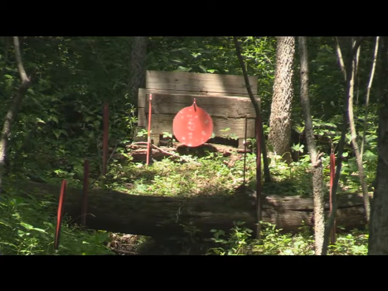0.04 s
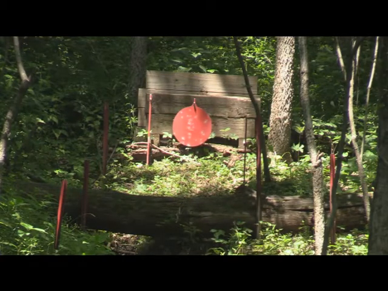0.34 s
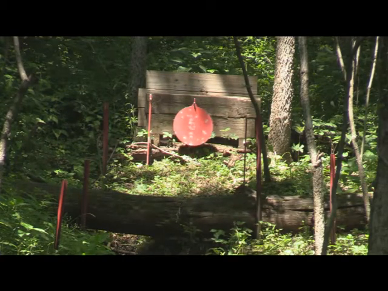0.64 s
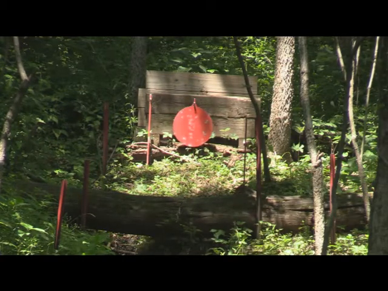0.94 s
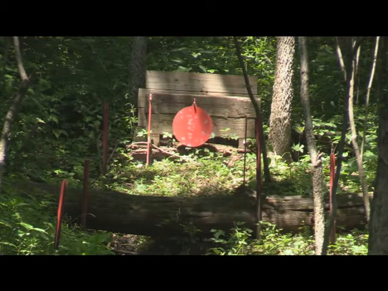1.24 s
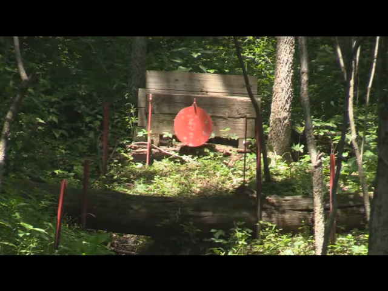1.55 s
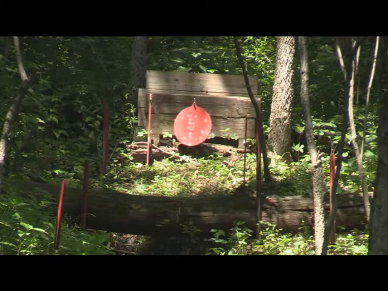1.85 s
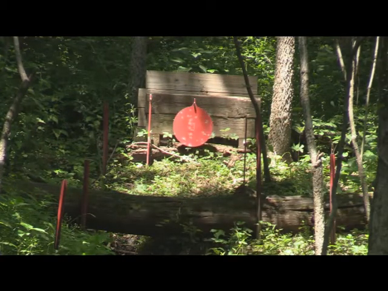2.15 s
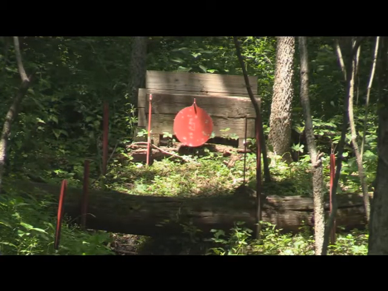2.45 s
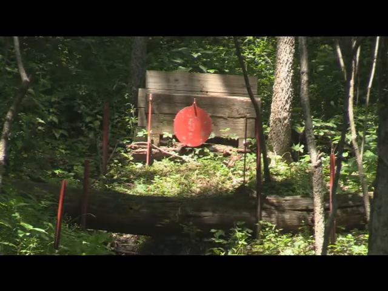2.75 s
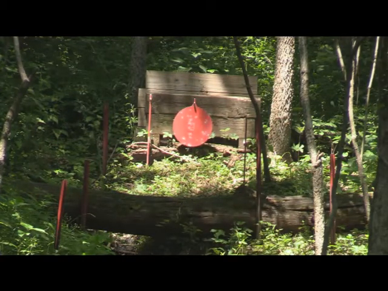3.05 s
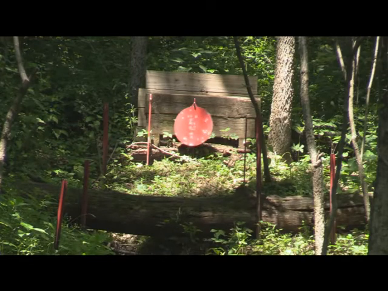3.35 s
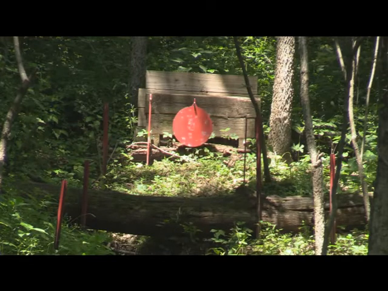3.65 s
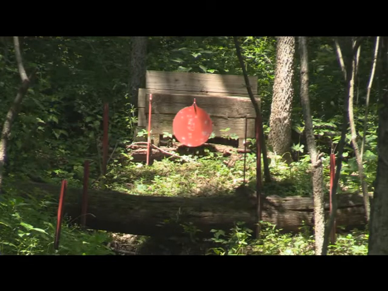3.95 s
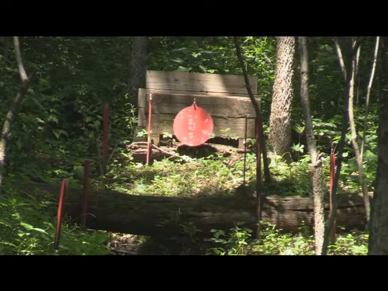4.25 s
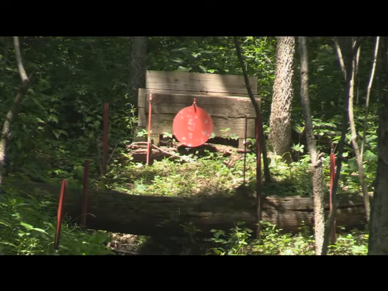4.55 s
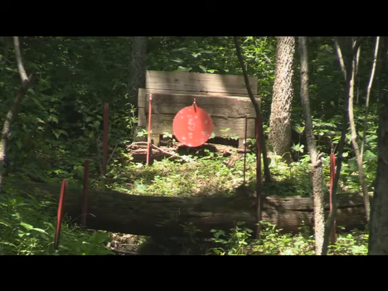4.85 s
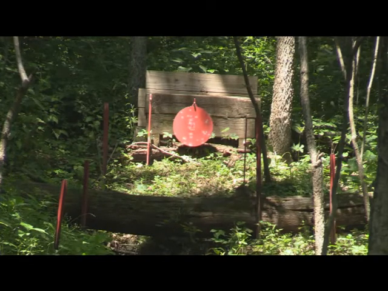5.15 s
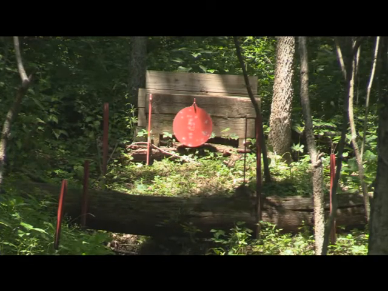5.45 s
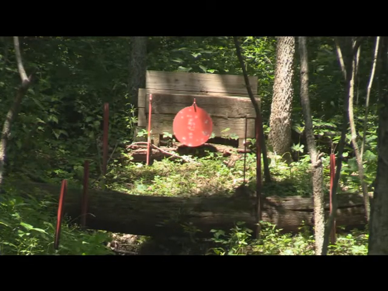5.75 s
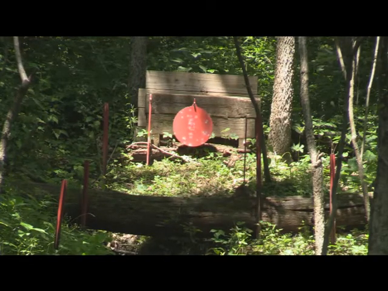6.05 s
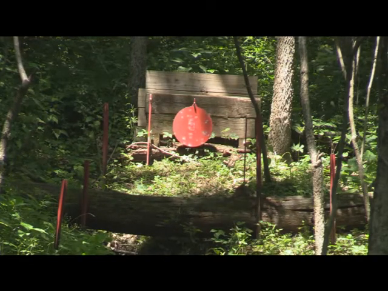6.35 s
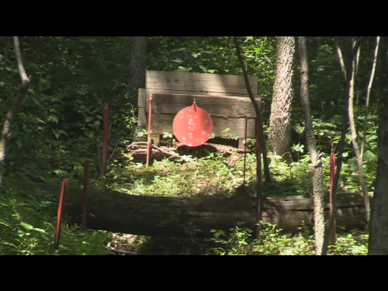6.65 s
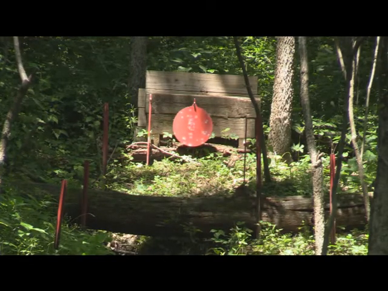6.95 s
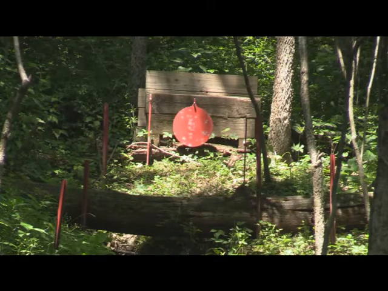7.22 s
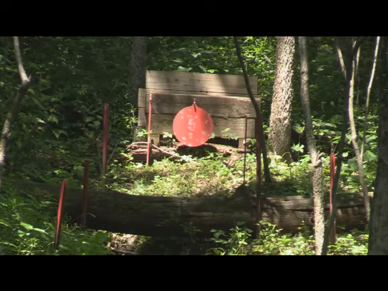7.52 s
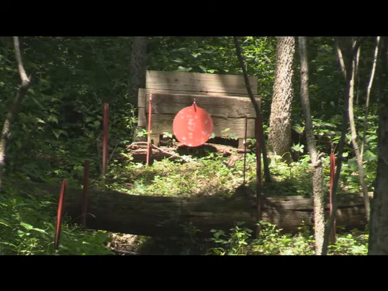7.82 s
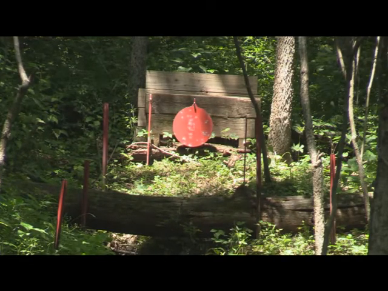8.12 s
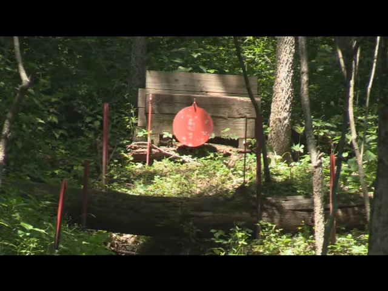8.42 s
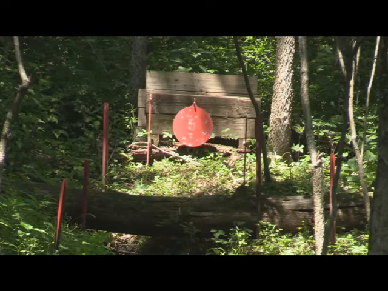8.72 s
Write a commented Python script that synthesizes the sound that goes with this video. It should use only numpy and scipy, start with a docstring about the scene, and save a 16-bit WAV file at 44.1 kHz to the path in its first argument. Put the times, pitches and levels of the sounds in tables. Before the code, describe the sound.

A small pistol fires five times outdoors, a far steel target ringing three times, with brass cases landing and metallic clicks afterward.

```python
"""A wood: five shots from a small pistol. Three bullets ring a distant steel gong, the last two hit the
boards behind it. Each report overloads the microphone and rolls back from the trees while the gain
control holds it level. Spent brass cases land nearby, then the pistol is handled with small metal
snaps, ticks and rubs. Leaves and far insects hiss throughout; a small bird whistles far off."""
import sys
import numpy as np
from scipy import signal
from scipy.fft import rfft, irfft, next_fast_len
from scipy.io import wavfile

SR = 44100
rng = np.random.default_rng(int(sys.argv[2]) if len(sys.argv) > 2 else 0)


def generate_wav(sig):
    """Save sig (samples, or channels by samples) to the path in sys.argv[1] as 16-bit PCM at SR."""
    pcm = np.round(np.clip(np.atleast_2d(sig).T, -1, 1) * 32767).astype(np.int16)
    wavfile.write(sys.argv[1], SR, pcm)


N = 396018
TIME = np.arange(N) / SR


def from_db(db):
    """Decibels to gain."""
    return 10 ** (np.asarray(db) / 20)


def fade(age, t60):
    """Zero before the start, then a fall of 60 dB per t60."""
    return (age >= 0) * np.exp(-np.log(1000) * np.maximum(age, 0) / t60)


def hump(age, width):
    """Bell curve around age zero."""
    return np.exp(-.5 * (age / width) ** 2)


def ages(length_s):
    """Sample times of a short sound."""
    return np.arange(int(length_s * SR)) / SR


def add(out, start_s, sound):
    """Mix a sound in; what falls outside is dropped."""
    at = int(round(start_s * SR))
    first, last = max(at, 0), min(at + len(sound), N)
    if last > first:
        out[first:last] += sound[first - at:last - at]


def db_at(colour, hz):
    """Level of a spectrum, interpolated over log frequency."""
    points_hz, db = np.transpose(colour)
    return np.interp(np.log(hz), np.log(points_hz), db)


def noise(colour, size=N):
    """Coloured noise, rms 1."""
    padded = next_fast_len(size, True)
    bin_hz = np.maximum(np.fft.rfftfreq(padded, 1 / SR), 1)
    x = irfft(rfft(rng.standard_normal(padded)) * from_db(db_at(colour, bin_hz)), padded)[:size]
    return x / x.std()


def swells(rows, colour):
    """Noise that rises and falls in bell curves."""
    return noise(colour) * sum(from_db(db) * hump(TIME - peak_s, width_s) for peak_s, db, width_s in rows)


# Each row: frequency in Hz, relative density in dB.
AIR_COLOUR = [(15, -40), (25, -3.5), (84, 0), (195, 1.5), (373, -1.5), (451, -4.5), (607, -5),
              (1290, -11.5), (1440, -11.5), (2350, -12.5), (5730, -10.5), (8140, -22.5), (14000, -28),
              (16000, -34)]


def air(level_db=-46.5):
    """Steady hiss of leaves and far insects."""
    return from_db(level_db) * noise(AIR_COLOUR)


# Each row: start in seconds, level in dB.
WHISTLES = [(8.207, -55), (8.54, -54), (8.865, -52)]


def bird(length_s=.085, from_hz=1750, to_hz=2900):
    """Thin whistles, each the same rising glide."""
    out, t = np.zeros(N), ages(length_s)
    pitch_hz = from_hz * (to_hz / from_hz) ** (t / length_s)
    phase = 2 * np.pi * np.cumsum(pitch_hz) / SR
    for start, db in WHISTLES:
        add(out, start, from_db(db) * np.sin(np.pi * t / length_s) * np.sin(phase))
    return out


# Each row: peak time in seconds, level in dB, half width in seconds.
HAND_SLIDES = [(7.33, -51, 0.12), (7.885, -41.5, 0.039), (8.14, -49.5, 0.094)]
SOFT_BUMPS = [(7.297, -40, 0.029)]
# Bright scrape, dull bump. Each row: frequency in Hz, relative density in dB.
SCRAPE_COLOUR = [(60, -34), (300, -6), (1500, 2), (3000, 1), (5500, 9.5), (8000, -5), (12000, -8),
                 (16000, -23)]
BUMP_COLOUR = [(30, -20), (70, 0), (110, 10), (200, -26), (400, -24), (2000, -47)]


def hands():
    """Something slides in the hands, with one soft bump."""
    return swells(HAND_SLIDES, SCRAPE_COLOUR) + swells(SOFT_BUMPS, BUMP_COLOUR)


# Each row: frequency in Hz, relative density in dB.
TICK_COLOUR = [(300, -26), (1500, -5), (3000, 1), (6000, 15.5), (8000, -1), (12000, 1), (16000, -25)]


def tick(t):
    """Sharp start of a small contact and its faint echo from the trees."""
    direct = from_db(5) * fade(t, t60=.0089)
    echo = from_db(-24) * fade(t, t60=.49)
    return noise(TICK_COLOUR, len(t)) * (direct + echo)


def contact(ring_hz=5560, t60=.02, ring_db=-3, spread=.1465, count=9):
    """Small metal contact, by default a touch on the pistol: a tick and a brief cluster of modes."""
    t = ages(.36)
    modes_hz = ring_hz * np.exp(spread * rng.uniform(-.93, 1, (count, 1)))
    ring = np.sin(2 * np.pi * modes_hz * t).sum(0) * np.sqrt(2 / count)
    return tick(t) + from_db(ring_db) * ring * fade(t, t60)


def grip(from_s=6.9, to_s=8.4, min_db=-51, max_db=-45, count=22):
    """Tiny random ticks as fingers shift on the grip."""
    out = np.zeros(N)
    for start, db in rng.uniform((from_s, min_db), (to_s, max_db), (count, 2)):
        add(out, start, from_db(db) * contact())
    return out


# Each row: start in seconds, level in dB.
LIGHT_TOUCHES = [(6.56, -37.5), (7.1117, -39), (7.152, -41), (7.598, -44), (8.1991, -41), (8.42, -44)]
# Each row: start in seconds, level in dB, ring in Hz.
ACTION_SNAPS = [(7.1825, -25, 6000), (8.0561, -31.5, 10900)]


def pistol_clicks(snap_t60_s=.043):
    """Light touches on the pistol and longer-ringing snaps of its action."""
    out = np.zeros(N)
    for start, db in LIGHT_TOUCHES:
        add(out, start, from_db(db) * contact())
    for start, db, ring_hz in ACTION_SNAPS:
        add(out, start, from_db(db) * contact(ring_hz, snap_t60_s))
    return out


# Each row: start in seconds, level in dB.
CATCH_HITS = [(7.66, -36), (7.6798, -27), (7.74, -42)]
# Each row: frequency in Hz, relative level in dB, T60 in seconds.
CATCH_RING = [(1630, 1, 0.026), (3120, -4, .018), (4540, -2, .018), (5590, 5, 0.032)]
# Each row: frequency in Hz, relative density in dB.
RATTLE_COLOUR = [(600, -34), (1500, 2), (2300, -7), (5600, 1.5), (7000, -9), (10000, -14), (16000, -32)]


def catch(rebound_s=.0045, rebound_db=-5, ring_db=-4, tick_db=-7):
    """A catch engages and rebounds once; the loose parts around it rattle."""
    out, t = np.zeros(N), ages(.3)
    for start, db in CATCH_HITS:
        for delay, loss_db in [(0, 0), (rebound_s, rebound_db)]:
            ring = sum(from_db(mode_db) * np.sin(2 * np.pi * (hz * t + rng.random())) * fade(t, t60)
                       for hz, mode_db, t60 in CATCH_RING)
            rattle = noise(RATTLE_COLOUR, len(t)) * fade(t, t60=.037)
            click = from_db(ring_db) * ring + rattle + from_db(tick_db) * tick(t)
            add(out, start + delay, from_db(db + loss_db) * click)
    return out


# Each row: start in seconds, level in dB.
CASE_LANDINGS = [(.572, -15.5), (.786, -30), (3.12, -16.5), (3.167, -28), (3.311, -41), (4.1757, -16),
                 (5.70, -38), (5.9366, -29)]


def cases():
    """Spent brass cases land and bounce beside the shooter."""
    out = np.zeros(N)
    for start, db in CASE_LANDINGS:
        add(out, start, from_db(db) * contact(ring_hz=4490, t60=.02))
    return out


# Each row: frequency in Hz, relative density in dB.
BOOM_COLOUR = [(60, -26), (160, -12), (270, -10.5), (480, 8.5), (1100, 4.5), (2000, 1.5), (5000, -13),
               (16000, -70)]


def slope_boom(level_db=-13, delay_s=.35, width_s=.051):
    """The far slope returns each shot as a dull boom."""
    booms = [(start + delay_s, level_db + echo_db, width_s) for start, _, echo_db in PISTOL_SHOTS]
    return swells(booms, BOOM_COLOUR)


# Echo from near trunks and from far off. Each row: frequency in Hz, density in dB.
NEAR_COLOUR = [(70, -22), (177, -5.5), (362, 7), (1020, 12.5), (2040, 7.5), (5650, 11.5), (7800, 3),
               (11700, -5), (15200, -18)]
FAR_COLOUR = [(70, -29), (177, -29.5), (645, -1.5), (1020, -6.5), (2040, -15), (4100, -36), (15200, -68)]


def forest(near_t60_s=1.33, far_t60_s=2.595, half_t60_hz=12040, first_echo_s=.012, build_s=.006,
           slope_db=3.7, slope_delay_s=.43, slope_width_s=.11, slope_above_hz=520, patchy_db=.86):
    """Trunks scatter each report; air and leaves absorb the treble; the far slope lifts the echo."""
    starts, _, echo_db = np.transpose(PISTOL_SHOTS)
    latest = np.maximum(np.searchsorted(starts, TIME, "right") - 1, 0)
    age = np.maximum(TIME - starts[latest], 0)
    lift_db = slope_db * hump(age - slope_delay_s, slope_width_s)
    padded = next_fast_len(N, True)
    bin_hz = np.maximum(np.fft.rfftfreq(padded, 1 / SR), 1)
    scattered = rfft(rng.standard_normal(padded)) * from_db(db_at(NEAR_COLOUR, bin_hz))
    bands_hz = np.geomspace(100, 15000, 11)
    knots_s = np.arange(0, N / SR, .008)
    out = np.zeros(N)
    for share, hz in zip(np.eye(len(bands_hz)), bands_hz):
        band = irfft(scattered * np.interp(np.log(bin_hz), np.log(bands_hz), share), padded)[:N]
        flicker_db = patchy_db * np.interp(TIME, knots_s, rng.standard_normal(len(knots_s)))
        near = from_db(lift_db * (hz > slope_above_hz)) * fade(age, near_t60_s / (1 + hz / half_t60_hz))
        far = from_db(db_at(FAR_COLOUR, hz) - db_at(NEAR_COLOUR, hz)) * fade(age, far_t60_s)
        out += band * from_db(flicker_db) * np.hypot(near, far)
    onset = 1 - np.exp(-np.maximum(age - first_echo_s, 0) / build_s)
    return out * from_db(echo_db[latest]) * onset


# Each row: changes per second, depth.
WAVER_RATES = [(8, 0.65), (30, 0.46), (110, 0.26)]


def wavering(hz, t):
    """A partial that swells as the plate swings and flutters as it arrives by many paths."""
    envelope = np.ones(len(t), complex)
    for rate_hz, depth in WAVER_RATES:
        knots_s = np.arange(0, t[-1] + 1 / rate_hz, 1 / rate_hz)
        wander = rng.standard_normal(len(knots_s)) + 1j * rng.standard_normal(len(knots_s))
        envelope += depth * np.interp(t, knots_s, wander)
    envelope /= np.sqrt(np.average(np.abs(envelope) ** 2, weights=fade(t, t60=6)))
    return np.imag(envelope * np.exp(2j * np.pi * hz * t))


# Each row: start in seconds, then impact, other-mode and main-mode gains in dB.
GONG_STRIKES = [(0.23, 1, -1, -2.5), (1.444, 2, -1, -1), (2.803, -3.5, 0.5, -1)]
# Main mode first. Each row: frequency in Hz, then level in dB for each of three spots hit.
GONG_MODES = [(1501, -5, -1, -9), (662, -17, -20, -28), (2577, -9, -14, -17), (2778, -12, -7, -17),
              (3440, -26, -13, -16), (3845, -9, -21, -14), (4185, -12, -19, -18), (4336, -8, -12, -1),
              (4514, -10, -25, -22), (4570, -36, -5, -16), (5088, -21, -17, -23), (5288, -10, -18, -6),
              (5596, -22, -11, -23), (5984, -7, -8, -10), (6069, -4, -26, -4), (6245, -18, -13, -13),
              (6653, -13, -21, -20), (6890, -24, -19, -20), (7109, -23, -14, -19), (7206, -34, -12, -21),
              (7963, -6, -32, -20), (8458, -28, -35, -17), (8575, -25, -17, -20), (8741, -35, -12, -21),
              (9990, -15, -28, -17), (10526, -39, -11, -18), (10691, -23, -18, -18), (10790, -17, -31, -28),
              (12255, -26, -20, -22), (13227, -21, -31, -36)]
# Each row: frequency in Hz, typical level in dB.
WEAK_MODE_LEVELS = [(2300, -11), (7000, -25), (11500, -31), (15000, -46)]


def gong(main_db=16, main_t60_s=1.11, main_rise_s=.64, beat_hz=1.85, beat_nulls_s=(.61, .44, .42),
         t60_at_4khz_s=.91, damping_slope=.18, bloom_db=5, bloom_s=.11, weak_count=36):
    """Steel disc with many modes; the main one is a close pair that builds slowly and beats."""
    out, t = np.zeros(N), ages(1.4)
    # The ring swells as the plate swings back and tree reflections join in.
    build_up = 1 - .6 * np.exp(-t / .05)
    bloom = build_up * from_db(bloom_db * hump(t - bloom_s, width=.18))
    curve_hz, curve_db = np.transpose(WEAK_MODE_LEVELS)
    weak_hz = curve_hz[0] + np.ptp(curve_hz) * np.sqrt(rng.random(weak_count))   # denser at the top
    (main_hz, *main_spot_db), *others = GONG_MODES
    for hit, (start, _, ring_db, pair_db) in enumerate(GONG_STRIKES):
        weak_db = np.interp(weak_hz, curve_hz, curve_db) + 5 * rng.uniform(-.49, 1, weak_count)
        modes = [(hz, spot_db[hit]) for hz, *spot_db in others] + list(zip(weak_hz, weak_db))
        ring = np.zeros(len(t))
        for hz, db in modes:
            t60 = t60_at_4khz_s * (max(hz, 2500) / 4000) ** -damping_slope
            ring += from_db(ring_db + db) * wavering(hz, t) * fade(t, t60)
        beat = np.sin(np.pi * beat_hz * (t - beat_nulls_s[hit]))
        envelope = (1 - np.exp(-t / main_rise_s)) * fade(t, main_t60_s)
        pair = beat * envelope * np.sin(2 * np.pi * main_hz * t)
        add(out, start, bloom * ring + from_db(main_db + pair_db + main_spot_db[hit]) * pair)
    return out


# Each row: start in seconds, level in dB.
BOARD_STRIKES = [(3.863, -6), (5.403, -4.5)]


def impacts(steel_t60_s=.013, board_t60_s=.018):
    """Lead splashes on steel or snaps into wood."""
    out, t = np.zeros(N), ages(.057)
    for strikes, t60 in [(GONG_STRIKES, steel_t60_s), (BOARD_STRIKES, board_t60_s)]:
        for start, db, *_ in strikes:
            add(out, start, from_db(db) * noise(SCRAPE_COLOUR, len(t)) * fade(t, t60))
    return out


# Each row: start in seconds, blast gain in dB, echo gain in dB.
PISTOL_SHOTS = [(-.047, -1, 0), (1.1697, -4, -0.5), (2.5219, -2, -0.5), (3.588, -2, -1), (5.1255, -2, -1.5)]
# Muzzle blast and its ground echo. Each row: frequency in Hz, relative density in dB.
CRACK_COLOUR = [(60, 6), (600, 0), (2000, -4), (5500, -1.5), (9000, -8), (16000, -19)]
GROUND_COLOUR = [(60, -3), (300, 1.5), (1100, 5.5), (2500, -8.5), (6000, 0), (9000, -15), (16000, -22)]


def blasts(crack_s=.0039, ground_delay_s=.008, action_s=.0035, thump_hz=210, push_hz=72, settle_hz=8.4):
    """The action snaps, the muzzle cracks, and the ground returns the crack and the pressure wave."""
    out, t = np.zeros(N), ages(.54)
    ground_age, push_age = t - ground_delay_s, t - crack_s
    front = np.exp(-(t / crack_s) ** 8)
    wake = from_db(-17) * fade(t, t60=.046)
    thump = from_db(15) * np.cos(2 * np.pi * thump_hz * ground_age) * fade(ground_age, t60=.017)
    # The pressure wave pushes the microphone, which settles slowly.
    push = from_db(9) * np.sin(2 * np.pi * push_hz * push_age) * fade(push_age, t60=.033)
    settle_phase = 2 * np.pi * settle_hz * (t + 2 * ground_delay_s)
    settle = -from_db(-6) * np.sin(settle_phase) * fade(push_age, t60=.37)
    for start, db, _ in PISTOL_SHOTS:
        crack = from_db(17) * noise(CRACK_COLOUR, len(t)) * (front + wake)
        ground = from_db(17) * noise(GROUND_COLOUR, len(t)) * fade(ground_age, t60=.088)
        add(out, start, from_db(db) * (crack + ground + thump + push + settle))
        action = from_db(-29) * noise(SCRAPE_COLOUR, int(action_s * SR))
        add(out, start - action_s, action)
    return out


def scene():
    """Everything at one microphone beside the shooter."""
    shooting = blasts() + forest() + slope_boom() + gong() + impacts()
    handling = cases() + pistol_clicks() + catch() + grip() + hands()
    return (shooting + handling + bird() + air())[None]


def smooth(x, time_s, initial):
    """One-pole low-pass."""
    pole = np.exp(-1 / (time_s * SR))
    return signal.lfilter([1 - pole], [1, -pole], x, zi=[pole * initial])[0]


def gain_control(x, hold_db=-11.5, max_cut_db=16, sense_s=.0041, attack_s=.0042, release_db_per_s=130):
    """Gain drops quickly above the held level and recovers more slowly."""
    power = smooth(x ** 2, sense_s, initial=np.mean(x[:256] ** 2))
    excess_db = np.clip(10 * np.log10(power + 1e-12) - hold_db, 0, max_cut_db)
    release_db = release_db_per_s * TIME
    cut_db = np.maximum.accumulate(excess_db + release_db) - release_db
    return x * from_db(-smooth(cut_db, attack_s, initial=cut_db[0]))


def record(dry, headroom=7.2, cutoff_hz=15700):
    """The microphone stage saturates, the gain control acts, the converter clips and the top is cut."""
    saturated = dry[0] / (1 + (dry[0] / headroom) ** 4) ** (1 / 4)
    clipped = np.clip(gain_control(saturated), -1, 1)
    lowpass = signal.ellip(10, .1, 70, cutoff_hz, fs=SR, output="sos")
    return signal.sosfilt(lowpass, clipped)[None]


dry = scene()
out = record(dry)
generate_wav(out)
```